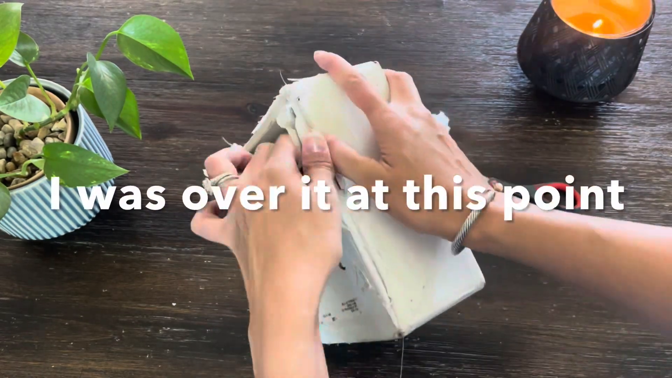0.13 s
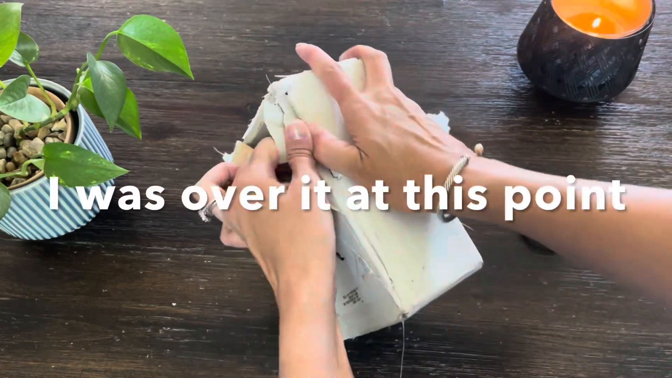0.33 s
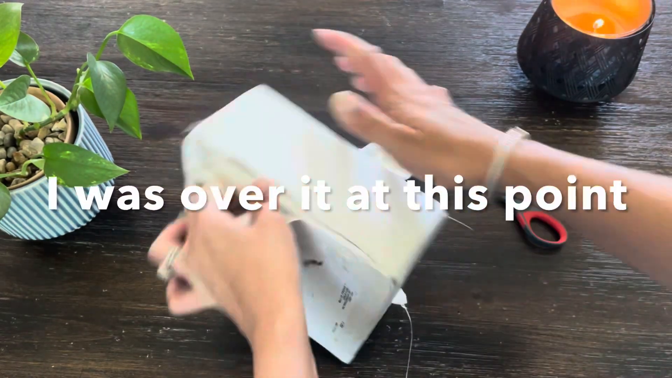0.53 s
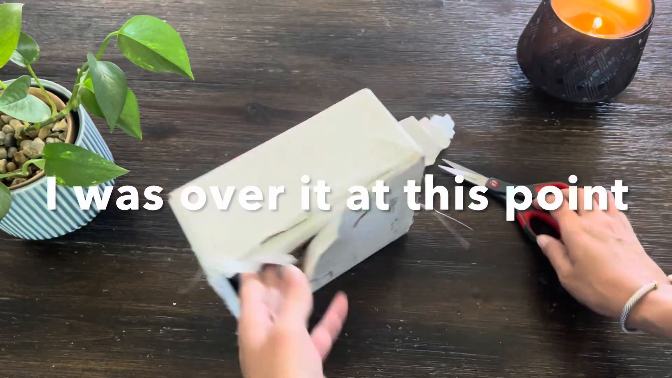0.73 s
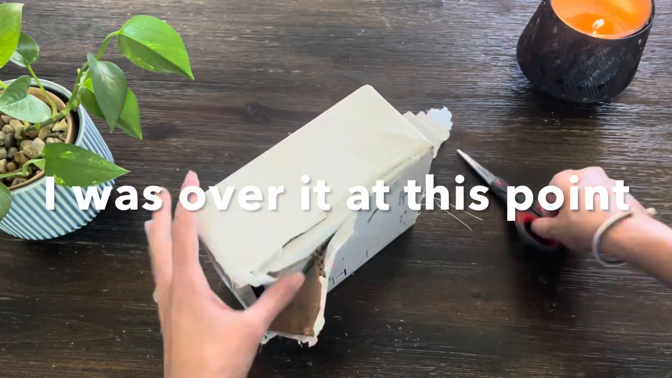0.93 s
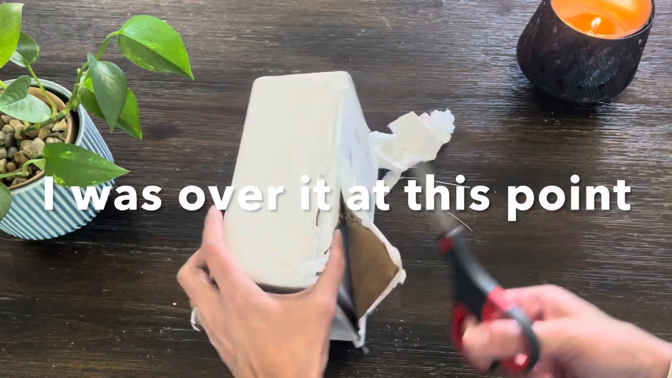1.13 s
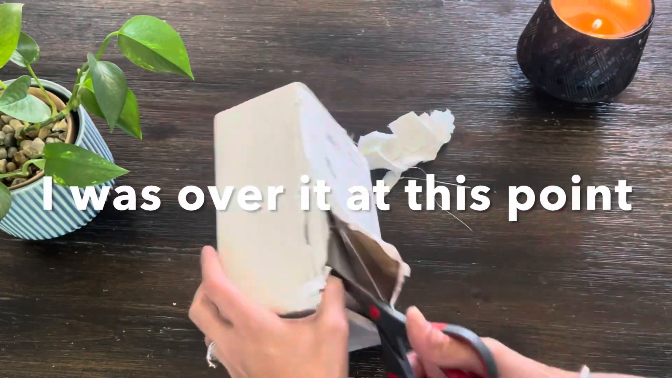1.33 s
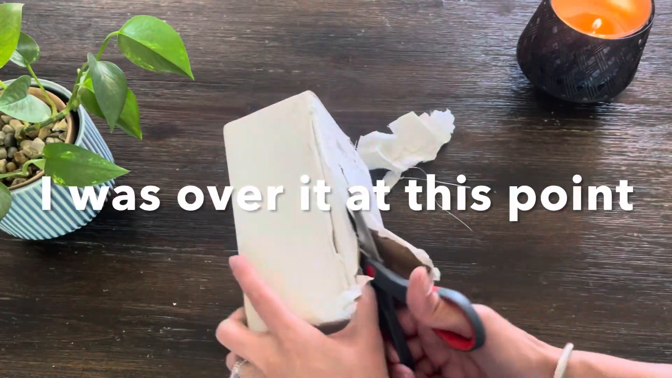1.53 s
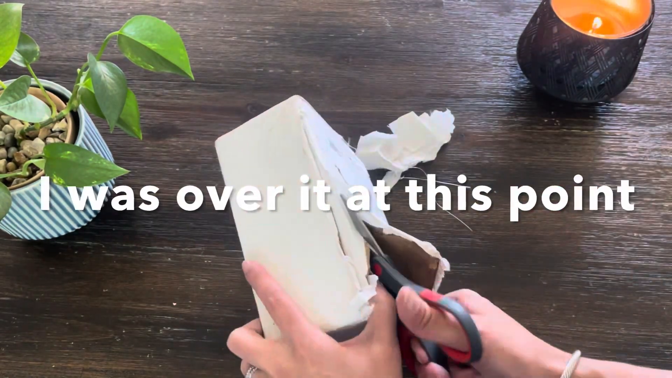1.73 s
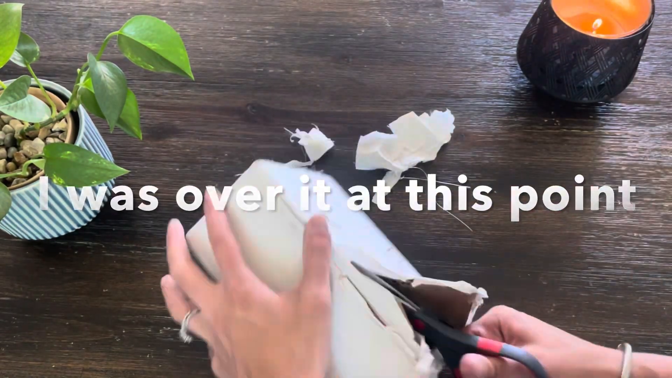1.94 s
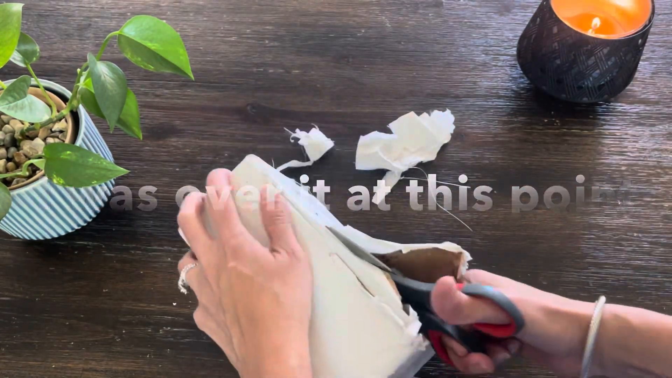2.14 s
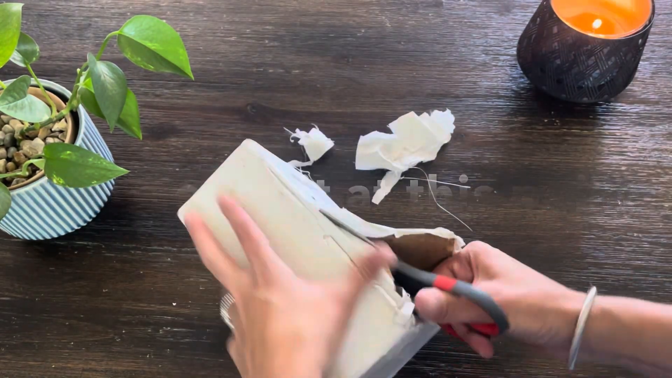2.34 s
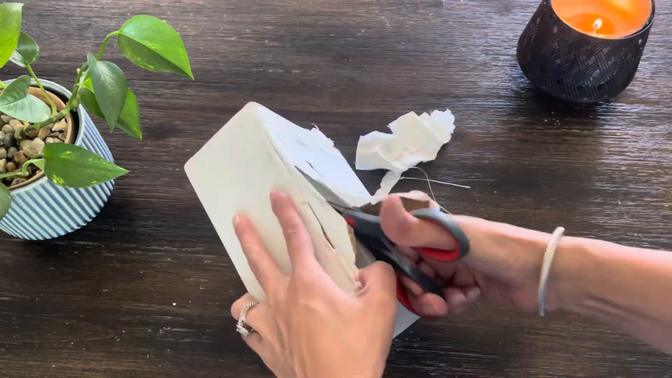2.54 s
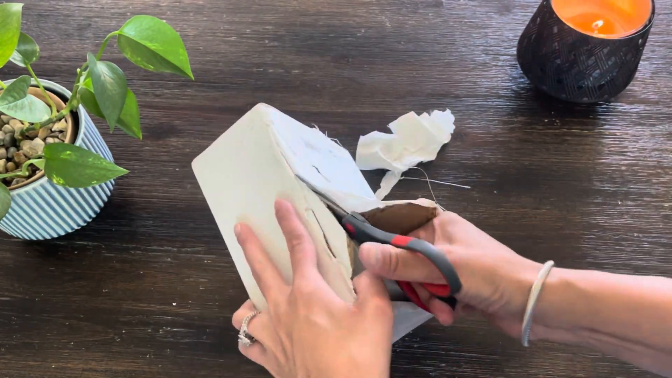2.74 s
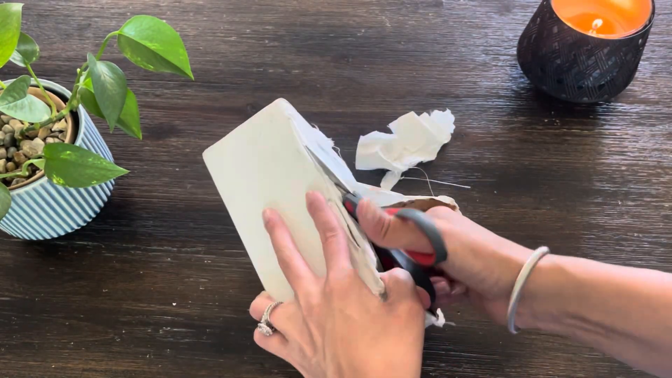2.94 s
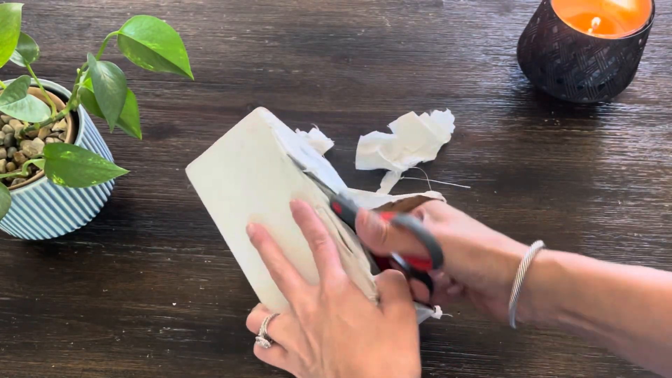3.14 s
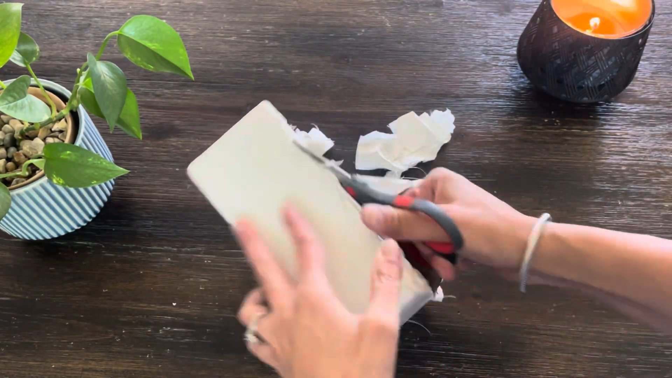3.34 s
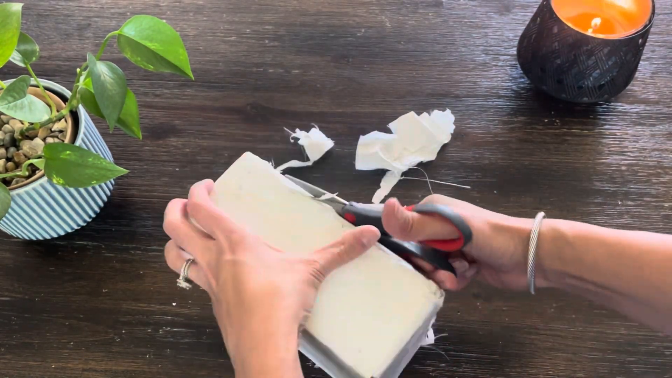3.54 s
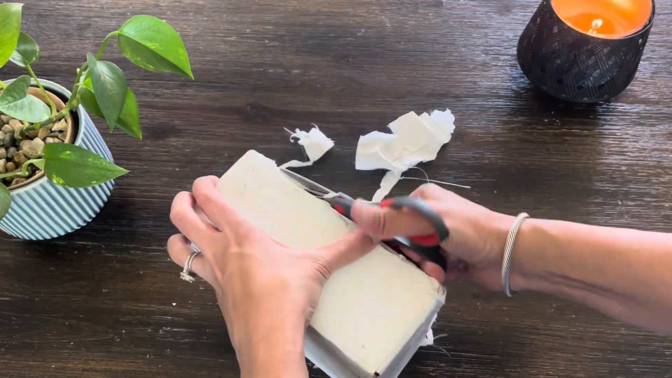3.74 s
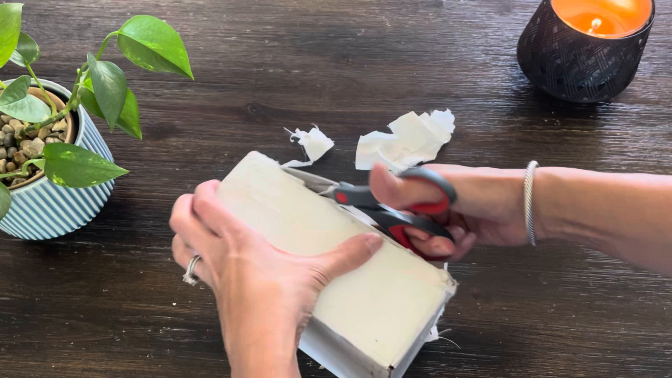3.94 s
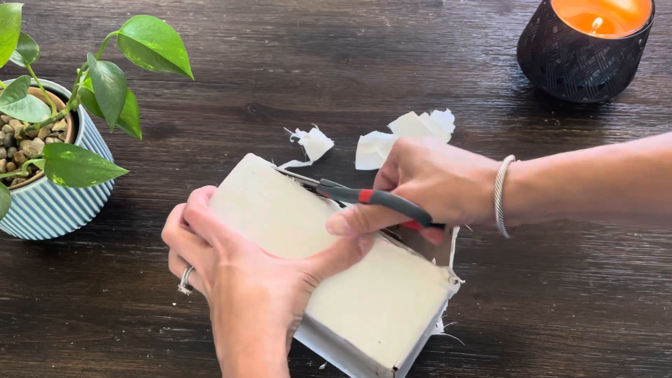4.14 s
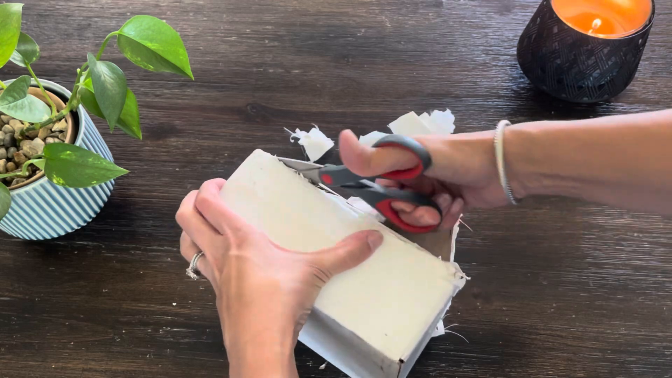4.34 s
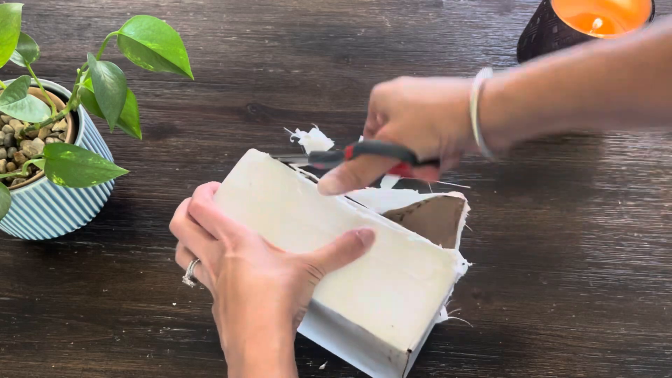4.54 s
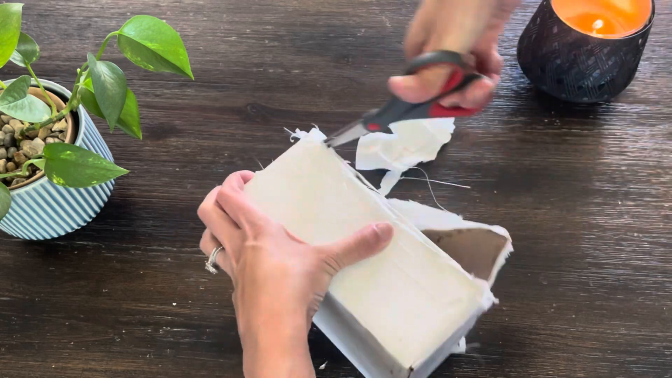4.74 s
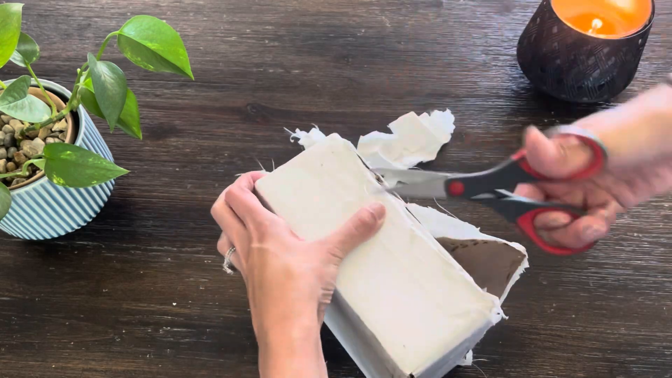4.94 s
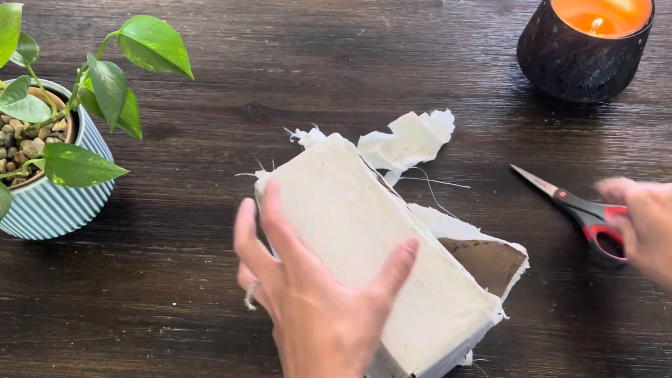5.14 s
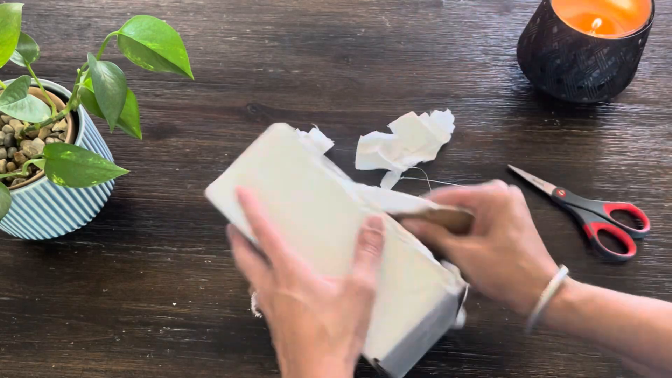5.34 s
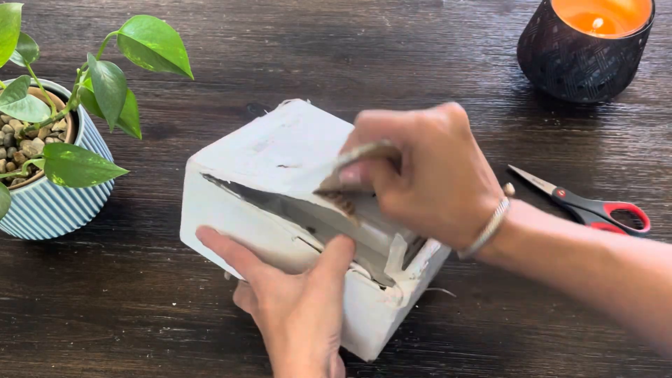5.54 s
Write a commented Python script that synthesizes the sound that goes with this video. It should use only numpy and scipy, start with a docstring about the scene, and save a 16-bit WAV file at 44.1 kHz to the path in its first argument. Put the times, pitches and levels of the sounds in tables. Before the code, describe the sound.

Hands rub and snap a stiff cardboard box, scissors crunch along its edge in quick bursts, then clatter onto a wooden table.

```python
"""Hands turn a stiff cardboard box on a wooden table, close by in a small room: skin and board rub, the hollow
box bumps in its damped low modes, and the board breaks in single snaps, fibre rasps and stick-slip creaks.
Scissors then cut along the edge in runs of snaps, each one a noise crack, a ringing flap and hollow box modes;
the blades click in noise. Late on the scissors drop, ringing in steel modes and drumming on the wood,
and at the end a flap starts to tear off in a grainy rasp. Faint room air lies under it all."""
import sys
import numpy as np
from scipy import signal
from scipy.fft import rfft, irfft
from scipy.io import wavfile

SR = 44100
rng = np.random.default_rng(int(sys.argv[2]) if len(sys.argv) > 2 else 0)


def pcm_store(signal):
    """Save signal as 16-bit PCM."""
    levels = np.round(np.clip(np.atleast_2d(signal), -1, 1) * 32767)
    wavfile.write(sys.argv[1], SR, levels.astype(np.int16).T)


N = 250488
SIZE = 16384  # samples in one short sound
AGE = np.arange(SIZE) / SR  # seconds since a short sound began
CRACK_REF_DB = -36.5  # an average crack

# Spectrum of breaking board. Each row: frequency in Hz, level in dB.
CRACK_SPECTRUM = [(80, -69.5), (400, -22), (900, -4), (1400, -4), (2000, 2.5), (3000, -0.5), (4200, -1),
                  (5500, 0), (8000, -4), (16000, -3)]
# Spectrum of rasping and ticking fibres. Each row: frequency in Hz, level in dB.
FIBRE_SPECTRUM = [(300, -16), (700, 3), (1300, -4), (1900, 0), (2400, -5.5), (3200, -1), (4300, -0.5),
                  (5600, -3), (7000, -1.5), (10000, -6), (16000, 3)]


def from_db(db):
    """Decibels to gain."""
    return 10 ** (np.asarray(db) / 20)


def rms_one(x):
    """Scale to rms 1."""
    return x / np.sqrt(np.mean(x ** 2) + 1e-20)


def blow(x, db):
    """Give a short sound the energy of 10 ms at the level db."""
    blow_s = 0.01
    return from_db(db) * x / np.sqrt(np.mean(x ** 2) * x.shape[-1] / (blow_s * SR) + 1e-20)


def freqs(size):
    """Frequencies of a real transform in Hz, kept above zero."""
    return np.maximum(np.fft.rfftfreq(size, 1 / SR), 1)


def at_hz(points, hz):
    """Read a table on a log-frequency axis."""
    f, value = np.transpose(points)
    return np.interp(np.log(hz), np.log(f), value)


def add(out, s, x):
    """Mix a sound in at s seconds."""
    start = max(int(s * SR), 0)
    out[:, start:start + x.shape[-1]] += x[..., :N - start]


def high_pass(x, hz):
    """Remove the bass below hz."""
    return signal.sosfilt(signal.butter(4, hz, "high", fs=SR, output="sos"), x)


def colour(x, spectrum, tilt_db=0):
    """Causal (minimum-phase) filter with a spectrum and a tilt in dB per octave above a knee."""
    knee_hz = 2070  # blunt contacts and slow breaks lose their treble above this
    size = x.shape[-1]
    hz = freqs(size)
    octaves = np.log2(1 + (hz / knee_hz) ** 4) / 4
    level_db = at_hz(spectrum, hz) + tilt_db * octaves
    # Folding the cepstrum onto positive time gives minimum phase.
    cepstrum = irfft(np.log(from_db(level_db)), size)
    cepstrum[1:size // 2] *= 2
    cepstrum[size // 2 + 1:] = 0
    return irfft(rfft(x) * np.exp(rfft(cepstrum)), size)


def spread(pair):
    """Two unrelated signals become left and right, alike in the bass and less so in the treble."""
    # Likeness of the two channels. Each row: frequency in Hz, correlation from 0 to 1.
    likeness = [(100, 1), (400, 0.95), (1000, 0.4), (2500, 0.71), (5000, 0.57), (15000, 0.39)]
    size = pair.shape[-1]
    mid, side = rfft(pair)
    alike = np.clip(at_hz(likeness, freqs(size)), 0, 1)
    return irfft(np.sqrt(1 + alike) * mid + np.sqrt(1 - alike) * side * [[1], [-1]], size)


def drift(rate, size):
    """Slow random line about 0 through normal values, rate of them a second."""
    knots = np.arange(size) * rate / SR
    return np.interp(knots, np.arange(N // 40), rng.standard_normal(N // 40))


def grains(per_s, size_db, smooth, size):
    """Fibres letting go: random clicks of uneven size over a bed of fine friction."""
    born = rng.random(size) < per_s / SR
    strength = from_db(size_db * np.minimum(rng.exponential(1, size), 4))
    clicks = born * strength * rng.standard_normal((2, size))
    return spread(rms_one(clicks) + smooth * rng.standard_normal((2, size)))


def ring(hz, t60):
    """A struck mode: a sine that falls by 60 dB in t60 seconds."""
    return np.sin(2 * np.pi * hz * AGE) * from_db(-60 * AGE / t60)


def strike(modes, uneven_db, detune=0):
    """Every blow meets the modes with strengths, pitches and signs of its own."""
    total = 0
    for hz, db, t60 in modes:
        strength, pitch, sign = rng.uniform(-1, 1, 3)
        gain = np.sign(sign) * from_db(db + uneven_db * strength)
        total = total + gain * ring(hz * (1 + detune * pitch), t60)
    return total


def crack(spectrum, tilt_db, t60):
    """A very short burst of breaking or contact noise, with its deepest peaks and notches evened out."""
    burst = rfft(spread(rng.standard_normal((2, SIZE))) * from_db(-60 * AGE / t60))
    evened = irfft(burst / np.sqrt(abs(burst) + 1e-9), SIZE)
    return colour(evened * (AGE < AGE[-1] / 2), spectrum, tilt_db)


def bend(x, delay_s):
    """Bending waves in board run faster at high pitch: a click becomes a falling chirp; delay_s is at 1 kHz."""
    phase = 4 * np.pi * delay_s * np.sqrt(1000 * freqs(SIZE))
    return irfft(rfft(x) * np.exp(-1j * phase), SIZE)


def panel(hz, cycles, upper_db):
    """A damped sheet of board: one broad mode and two weaker ones above it; t60 lasts cycles periods."""
    t60 = cycles / hz
    upper = strike([(hz * 1.41, 0, t60), (hz * 1.934, -4, 0.6 * t60)], uneven_db=0.5, detune=0.12)
    return high_pass(ring(hz, t60) + from_db(upper_db) * upper, hz * 0.53)


def hollow(hz, focus_db):
    """The box rings most near hz, by focus_db per octave; the grip detunes it from blow to blow."""
    # Modes of the hollow box. Each row: frequency in Hz, level in dB, t60 in seconds.
    box_modes = [(113.6, -14, 0.045), (183.8, -0.5, 0.13), (222.5, 0.5, 0.08), (273, 2, 0.11),
                 (327, 2, 0.076), (366.4, 0, 0.07), (445, 1, 0.062)]
    modes = [(f, db - focus_db * abs(np.log2(f / hz)), t60) for f, db, t60 in box_modes]
    return high_pass(strike(modes, uneven_db=4.5, detune=0.016), 115)


def snaps():
    """Single breaks and those of the cuts: fibres splinter first, then the board snaps."""
    # Single breaks of the board. Each row: start in seconds, flap level in dB, flap pitch in Hz,
    # hollow box level in dB, crack level in dB.
    single_breaks = [(0.5675, -27, 760, -28, -36), (0.807, -43.5, 1900, -50, -52),
                     (1.0264, -46, 567, -38, -53.5), (1.158, -37, 800, -42, -38.5),
                     (1.159, -38, 2000, -55, -52), (1.6952, -41.5, 907, -51, -46),
                     (1.7418, -35, 1060, -36, -44), (1.8053, -37, 740, -37.5, -42),
                     (1.9759, -14.5, 1255, -22, -15), (1.9819, -21.5, 530, -19.5, -52),
                     (2.1653, -42.5, 1330, -46, -58), (2.2139, -44, 920, -57, -45.5),
                     (2.699, -31.5, 1135, -49, -46), (2.7033, -19.5, 956, -34, -21),
                     (3.2625, -34, 740, -40, -52.5), (3.4326, -28, 606, -50, -48),
                     (3.5696, -43, 710, -51, -48), (3.9377, -37.5, 653, -35.5, -44),
                     (4.5157, -34.5, 836, -47, -44), (4.8907, -40, 620, -33, -41),
                     (5.315, -41.5, 800, -59, -50), (5.4285, -29, 710, -50, -40.5),
                     (5.5312, -36, 680, -50.5, -38)]
    average_db, follows = -41, 0.65  # splintering at an average crack; share of the crack's swing it follows
    lead_s = 0.004
    out = np.zeros((2, N))
    for s, flap_db, flap_hz, box_db, crack_db in [*single_breaks, *cuts()]:
        add(out, s - 0.0003, snap(flap_db, flap_hz, box_db, crack_db))
        splinter_db = average_db + follows * (crack_db - CRACK_REF_DB)
        add(out, s - lead_s, splinter(splinter_db, tilt_db=-13.0, lead_s=lead_s, trail_s=0.0032))
    return out


def cuts():
    """Closing blades break the board at an even pace, harder to a peak, then softer; a lesser snap follows each."""
    # Runs of snaps along the edge. Each row: time of the hardest snap in seconds, snaps before it,
    # snaps after it (rounded), gap in seconds, and levels in dB of flap, hollow box and crack.
    runs = [(2.6694, 2, 0, 0.021, -31.5, -38.5, -34), (2.994, 2, 1.5, .0128, -24.5, -36, -33),
            (3.2895, 0, 1.5, .0229, -24, -28.5, -33.5), (4.0884, 0, 4, .0146, -25.5, -28.5, -32.5)]
    bite_db, ease_db = 4, 2.33  # per snap: the cut builds up, then eases off
    flap_centre_hz, flap_scatter = 824, 0.17  # flap beside the blades; share by which its pitch varies
    lesser_db, lesser_spread_db = -12, 1.5  # lesser snap against the main one; how much it varies
    rows = []
    for s, before, after, gap_s, flap_db, box_db, crack_db in runs:
        for k in range(-round(before), round(after) + 1):
            force_db = min(k * bite_db, -k * ease_db)
            late, luck = rng.uniform(0.25, 0.75), rng.uniform(-1, 1)
            lesser_force_db = force_db + lesser_db + lesser_spread_db * luck
            for step, db in (k, force_db), (k + late, lesser_force_db):
                flap_hz = flap_centre_hz * (1 + flap_scatter * rng.uniform(-1.2, 1))
                rows.append((s + step * gap_s, flap_db + db, flap_hz, box_db + db, crack_db + db))
    return rows


def snap(flap_db, flap_hz, box_db, crack_db):
    """One break cracks, flicks the cut flap and sets the box ringing; the bigger the break, the duller its crack."""
    average_tilt_db, dulling = -5, 0.37  # dB per octave for an average crack; tilt lost per dB of strength
    tilt_db = average_tilt_db - dulling * (crack_db - CRACK_REF_DB)
    box = blow(hollow(270, focus_db=4.5), box_db)
    flap = blow(panel(flap_hz, cycles=9.4, upper_db=-5.5), flap_db)
    tear = blow(crack(CRACK_SPECTRUM, tilt_db, t60=0.0096), crack_db)
    return bend(box + flap + tear, delay_s=0.000978)


def splinter(db, tilt_db, lead_s, trail_s):
    """Single fibres give way in a swell of lead_s seconds up to a break, then die away after it."""
    swell = np.minimum(AGE / lead_s, 1) ** 2 * np.exp(-np.maximum(AGE - lead_s, 0) / trail_s)
    fibres = swell * grains(per_s=3600, size_db=7, smooth=0.5, size=SIZE)
    return blow(colour(fibres, CRACK_SPECTRUM, tilt_db), db)


def knocks():
    """Soft contacts reach only the low modes of the box and its panels; the thud swells as the box gives."""
    # Bumps of the box on the table or a hand. Each row: start in seconds, thud level in dB, thud pitch in Hz,
    # panel level in dB.
    bumps = [(0.064, -41.5, 328, -43.5), (0.284, -49.5, 290, -48), (0.33, -49.5, 242, -60),
             (0.568, -41, 254, -25), (0.615, -29.5, 217, -29.5), (0.655, -35, 262, -51),
             (0.847, -37.5, 329, -38), (0.885, -34, 344, -37.5), (1.06, -35.5, 260, -57),
             (1.384, -39.5, 239, -45.5), (1.419, -33.5, 240, -42.5), (1.55, -39.5, 282, -45.5),
             (1.854, -36, 287, -37.5), (1.939, -34, 236, -46), (2.189, -35, 271, -44.5),
             (2.445, -34.5, 291, -36.5), (2.509, -36.5, 272, -37), (2.772, -35.5, 257, -37.5),
             (2.852, -35.5, 343, -39), (3.117, -30.5, 262, -32.5), (3.434, -20, 266, -46),
             (3.529, -26, 259.3, -33), (4.15, -42, 304, -37), (4.908, -37, 293, -38.5),
             (5.645, -42, 330, -44)]
    wall_hz, wall_scatter = 552.5, 0.035  # side wall of the box; share by which the grip detunes it
    soft = signal.butter(2, 1300, fs=SR, output="sos")
    give = (1 - np.exp(-AGE / 0.0051)) * from_db(-60 * AGE / 0.26)  # the holding hand damps the ring
    out = np.zeros((2, N))
    for s, thud_db, thud_hz, panel_db in bumps:
        panel_hz = wall_hz * (1 + wall_scatter * rng.uniform(-1, 1))
        thud = blow(give * signal.sosfilt(soft, hollow(thud_hz, focus_db=17.5)), thud_db)
        wall = blow(signal.sosfilt(soft, panel(panel_hz, cycles=20.0, upper_db=-5)), panel_db)
        add(out, s - 0.001, bend(thud + wall, delay_s=0.000994))
    return out


def rasps():
    """Short strokes of dense fibre crackle that swell and let go."""
    # Fibres rasp and tear. Each row: start in seconds, length in seconds, level in dB,
    # treble tilt in dB per octave.
    strokes = [(0.027, 0.039, -42, -1.5), (0.151, 0.019, -45, 1), (0.417, 0.025, -46.5, -3),
               (0.483, 0.01, -39, -1.5), (0.588, 0.058, -43.5, -2.5), (0.802, 0.014, -42, -19),
               (0.884, 0.013, -35.5, -6), (0.925, 0.024, -35, -15), (1.374, 0.016, -41, -2),
               (2.448, 0.013, -38.5, -5.5), (2.819, 0.039, -39.5, -2), (2.958, 0.033, -38, -6),
               (3.745, 0.014, -41, -3), (3.932, 0.028, -41.5, -1.5), (4.305, 0.049, -41.5, -6.5),
               (4.403, 0.041, -37.5, -6.5), (4.873, 0.021, -39, -1), (5.634, 0.041, -29.5, -1.5)]
    out = np.zeros((2, N))
    for s, length, db, tilt_db in strokes:
        stroke = np.interp(AGE / max(length, 0.004), [0, 0.3, 0.8, 1.35], [0, 1, 1, 0])
        flutter = from_db(4.6 * drift(209, SIZE))
        crackle = grains(per_s=2600, size_db=2.0, smooth=1.0, size=SIZE) * flutter
        add(out, s - 0.002, from_db(db) * stroke * rms_one(colour(crackle, FIBRE_SPECTRUM, tilt_db)))
    return out


def creaks():
    """Board sticks and slips: uneven slips pluck a panel again and again."""
    # Creaks at a panel resonance. Each row: start in seconds, length in seconds, level in dB, pitch in Hz.
    slow_slips = [(0.778, 0.032, -41.5, 390), (1.644, 0.063, -43.5, 750), (2.443, 0.04, -33.5, 568),
                  (2.485, 0.088, -48, 620), (2.619, 0.068, -49, 835), (4.407, 0.037, -34, 870),
                  (4.508, 0.068, -39.5, 874), (5.425, 0.036, -37, 750), (5.638, 0.031, -34.5, 584)]
    out = np.zeros((2, N))
    for s, length, db, hz in slow_slips:
        stroke = np.interp(AGE / max(length, 0.004), [0, 0.2, 0.75, 1.2], [0.17, 0.68, 1.0, 0.0051])
        slips = grains(per_s=900, size_db=1, smooth=0.6, size=SIZE)
        plucked = panel(hz, cycles=18, upper_db=-22.5)[None]
        sound = signal.fftconvolve(slips, plucked, axes=1)[:, :SIZE]
        add(out, s, from_db(db) * stroke * rms_one(sound))
    return out


def scissors():
    """Held blades only tick; dropped, they chatter against each other, ring and drum on the table."""
    # The blades touch each other. Each row: start in seconds, level in dB.
    blade_clicks = [(0.2218, -59), (2.157, -42.5), (2.1954, -43.5), (2.2518, -35), (2.6282, -34),
                    (3.5545, -46.5), (3.98, -44), (4.2512, -35.5), (5.4134, -50)]
    # The scissors land and bounce. Each row: start in seconds, then levels in dB of the steel
    # (before the trims below), the plastic handle and the table.
    landings = [(5.0951, -29.5, -39, -53), (5.0984, -22, -29, -18.5), (5.1065, -18.5, -44, -18.5),
                (5.1131, -26, -40, -25.5), (5.1366, -37, -22.5, -21), (5.148, -37, -35, -24.5),
                (5.162, -38.5, -36.5, -22.5)]
    # Modes of the steel. Each row: frequency in Hz, level in dB, t60 in seconds.
    steel_modes = [(1443, -3, .1), (1523, -2, .12), (1766, -4, .13), (1900, -6, .12), (2003, -6, .13),
                   (2720, -4, .12), (3085, -2, .14), (3182, -5, .13), (3343, -7, .17), (3618, -3, .14),
                   (3951, -9, .2), (5280, -4, .11), (5430, -2, .11), (5690, -5, .19), (5820, -4, .15),
                   (6072, -11, .18), (7800, -12, .17), (8050, -9, .15), (8742, -8, .14), (8900, -7, .14),
                   (9658, -11, .14), (11200, -9, .14), (13030, -14, .13), (14220, -15, .13)]
    # Modes of the wooden table. Each row: frequency in Hz, level in dB, t60 in seconds.
    table_modes = [(180, -11, .08), (235, -5, .07), (272, -3, .08), (326, 0, .14), (356, -1, .14),
                   (404, -4, .07), (528, -3, .1), (631, -4, .06), (735, -3, .06), (850, -5, .05),
                   (1010, -7, .05), (1220, -4, .05)]
    # Spectrum of steel touching. Each row: frequency in Hz, level in dB.
    tick_spectrum = [(500, -7), (1500, -2.5), (3200, 7.5), (4500, 1.5), (5700, 8), (7000, 0.5), (9000, 7),
                     (12000, 1), (16000, 2.5)]
    out = np.zeros((2, N))
    for s, db in blade_clicks:
        add(out, s, blow(crack(tick_spectrum, tilt_db=3.5, t60=0.0071), db))
    for s, steel_db, handle_db, table_db in landings:
        steel = spread(np.array([strike(steel_modes, uneven_db=2, detune=0.002) for _ in range(2)]))
        rattle = grains(per_s=2000, size_db=5.0, smooth=0.66, size=SIZE) * from_db(-60 * AGE / 0.063)
        chatter = colour(rattle, tick_spectrum, tilt_db=-8.0)
        contact = crack(tick_spectrum, tilt_db=-1.5, t60=0.013)
        handle = blow(panel(1460, cycles=17, upper_db=-8), handle_db)
        wood = high_pass(strike(table_modes, uneven_db=2, detune=0.025), 170)
        add(out, s, blow(steel, steel_db - 6.5) + blow(chatter, steel_db - 4) + blow(contact, steel_db - 3))
        add(out, s, bend(handle + blow(wood, table_db), delay_s=0.00078))
    return out


def crinkle(hiss_db):
    """While the board is handled, lone fibres tick now and then, more often under firm rubbing."""
    per_s, full_rate_hiss_db = 26, -50  # most ticks a second, reached at this level of skin hiss
    weakest_db, range_db = -1, 5  # weakest tick relative to the hiss; how much stronger a tick can be
    out = np.zeros((2, N))
    for when, size, sharpness, luck in rng.random((round(per_s * N / SR), 4)):
        level_db = hiss_db[int(when * N)]
        if luck < from_db(level_db - full_rate_hiss_db):
            tick = crack(FIBRE_SPECTRUM, -5 * sharpness, t60=0.008)
            add(out, when * N / SR, blow(tick, level_db + weakest_db + range_db * size ** 2))
    return out


def friction():
    """Rub and hiss levels in dB: each slide swells, holds and dies back to the grip, which sinks in the pauses."""
    # A hand or the box slides. Each row: start in seconds, length in seconds, panel rub level in dB,
    # skin hiss level in dB.
    slides = [(0.0, .29, -57.5, -53), (0.368, 0.12, -60.5, -56), (0.577, 0.2, -53.5, -53.5),
              (0.877, .07, -44, -54), (0.97, .06, -52, -54), (1.04, .19, -58, -60.5),
              (1.37, 0.28, -57.5, -66), (1.626, 0.082, -52, -56), (1.812, 0.042, -48.5, -49),
              (1.928, 0.18, -49.5, -53.5), (2.13, 0.14, -51.5, -55), (2.29, .14, -50, -49.5),
              (2.473, 0.083, -46, -49), (2.58, 0.31, -52, -55.5), (2.96, 0.096, -53, -57),
              (3.112, 0.051, -47, -51.5), (3.24, .1, -52.5, -56), (3.415, .05, -48.5, -59),
              (3.51, 0.14, -49.5, -51.5), (3.7, 0.087, -48, -50.5), (3.874, 0.14, -48.5, -55),
              (4.052, 0.1, -45, -53), (4.292, 0.37, -56, -54.5), (4.703, 0.062, -55.5, -53.5),
              (4.831, 0.057, -55, -56), (5.222, 0.12, -51.5, -55.5), (5.412, 0.48, -53, -53),
              (5.594, 0.074, -49, -37.5)]
    # The fingers lift off the box. Each row: start in seconds, length in seconds.
    pauses = [(0.314, 0.033), (1.243, 0.11), (1.879, 0.05), (3.194, 0.029), (4.665, .035), (4.98, .1)]
    attack_s, release_s = 0.013, 0.018  # swell around the start; time constant of dying away
    pause_db, pause_fade_s = -8, 0.013  # how far the hiss sinks (the rub by half), and how fast
    t = np.arange(N) / SR
    rub, hiss = from_db(-57.5), from_db(-60.5)  # fingers shifting as they hold the box
    for s, length, rub_db, hiss_db in slides:
        swell = np.clip((t - s) / attack_s + 0.5, 0, 1)
        stroke = swell * np.exp(-np.maximum(t - s - length, 0) / release_s)
        rub = np.maximum(rub, from_db(rub_db) * stroke)
        hiss = np.maximum(hiss, from_db(hiss_db) * stroke)
    lifted = 0
    for s, length in pauses:
        lifted = lifted + np.clip(np.minimum(t - s, s + length - t) / pause_fade_s + 0.5, 0, 1)
    return 20 * np.log10(rub) + 0.5 * pause_db * lifted, 20 * np.log10(hiss) + pause_db * lifted


def sliding(rub_db, hiss_db):
    """Skin and board rub unevenly: hollow rumble, panel noise and a fine grainy hiss."""
    # Spectrum of the hollow rumble. Each row: frequency in Hz, level in dB.
    rumble_spectrum = [(30, -19.5), (70, -26), (105, 4.5), (145, -3.5), (200, -0.5), (290, 1), (400, 0),
                       (600, -31), (1200, -32.5)]
    # Spectrum of the rubbed panel. Each row: frequency in Hz, level in dB.
    rub_spectrum = [(200, -37.5), (400, 2), (560, 5.5), (850, 1), (1300, -1.5), (2000, -11), (2800, -15.5),
                    (6000, -66.5)]
    # Spectrum of the skin hiss. Each row: frequency in Hz, level in dB.
    hiss_spectrum = [(1000, -27.5), (2300, -5), (3400, -2.5), (5000, -1), (7000, -6.5), (10000, -5),
                     (13000, -4), (16000, -8)]
    average_db, follows = -53.5, 0.45  # rumble under average rubbing; share of the rub's swing it follows
    rumble_db = average_db + follows * (rub_db - rub_db.mean())
    catch = drift(50, N)
    box = grains(per_s=490, size_db=-2.5, smooth=0.83, size=N)
    rumble = from_db(rumble_db + 1.6 * catch) * rms_one(colour(box, rumble_spectrum))
    board = grains(per_s=1000, size_db=3, smooth=1.42, size=N)
    rub = from_db(rub_db + 3.8 * catch) * rms_one(colour(board, rub_spectrum))
    skin = grains(per_s=2000, size_db=3, smooth=2.2, size=N)
    hiss = from_db(hiss_db + 3.2 * catch) * rms_one(colour(skin, hiss_spectrum))
    return rumble + wander(rub + hiss, depth_db=2.4, rate=35)


def wander(x, depth_db, rate):
    """As the contact moves over the board, each half octave swells and fades by itself."""
    centres = np.geomspace(500, 16000, 11)
    spectrum, place = rfft(x), np.log(freqs(N))
    total = 0
    for share in np.eye(len(centres)):
        band = irfft(spectrum * np.interp(place, np.log(centres), share), N)
        total = total + band * from_db(depth_db * drift(rate, N))
    return total


def room(x):
    """Dense reflections that die away octave by octave."""
    # Decay of the small room. Each row: frequency in Hz, t60 in seconds.
    room_t60 = [(150, 0.29), (500, 0.21), (1500, 0.24), (4000, 0.36), (14000, 0.23)]
    # Spectrum of the reflections. Each row: frequency in Hz, level in dB.
    room_colour = [(60, -1.5), (200, -2), (500, -1.5), (1000, -3), (2500, -2.5), (5000, -4), (9000, -4),
                   (16000, -2.5)]
    hz, tail = freqs(SIZE), 0
    noise = rfft(spread(rng.standard_normal((2, SIZE))))
    centres = np.geomspace(125, 16000, 8)
    for centre, share in zip(centres, np.eye(len(centres))):
        band = irfft(noise * np.interp(np.log(hz), np.log(centres), share), SIZE)
        tail = tail + band * from_db(-60 * AGE / at_hz(room_t60, centre))
    tail = tail * np.clip((AGE - 0.002) / 0.0026, 0, 1)  # reflections set in after 2 ms
    tail = colour(rms_one(tail) / np.sqrt(SIZE), room_colour)
    return signal.fftconvolve(x, tail, axes=1)[:, :N]


def room_air():
    """The quiet room: steady noise with a spectrum of its own."""
    # Spectrum of the room air. Each row: frequency in Hz, level in dB.
    air_spectrum = [(25, -10), (60, -8.5), (105, 8), (200, -13.5), (500, -12), (1500, -7), (5000, -20),
                    (16000, -55)]
    return from_db(-66.5) * rms_one(colour(spread(rng.standard_normal((2, N))), air_spectrum))


def scene():
    """The work on the table, a little to the right of the microphones, in a quiet room."""
    room_db, left_db, right_db = -6.5, -1.2, 1.1
    rub_db, hiss_db = friction()
    work = snaps() + knocks() + rasps() + creaks() + scissors() + crinkle(hiss_db)
    left, right = work + from_db(room_db) * room(work) + sliding(rub_db, hiss_db) + room_air()
    lag_s = 0.000012  # the sound reaches the left side later
    left = irfft(rfft(left) * np.exp(-2j * np.pi * freqs(N) * lag_s), N)
    return np.array([from_db(left_db) * left, from_db(right_db) * right])


def record(dry):
    """The hardest peaks are rounded off and the treble is cut steeply."""
    peak, cutoff_hz = 0.93, 16000
    held = peak * dry / (1 + (dry / peak) ** 6) ** (1 / 6)
    return signal.sosfilt(signal.ellip(10, 0.1, 90, cutoff_hz, fs=SR, output="sos"), held)


dry = scene()
out = record(dry)
pcm_store(out)
```